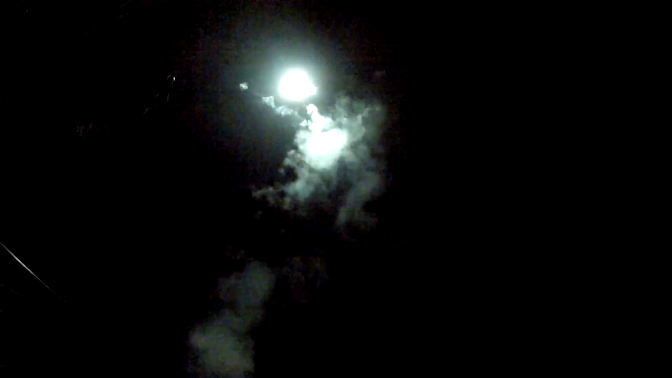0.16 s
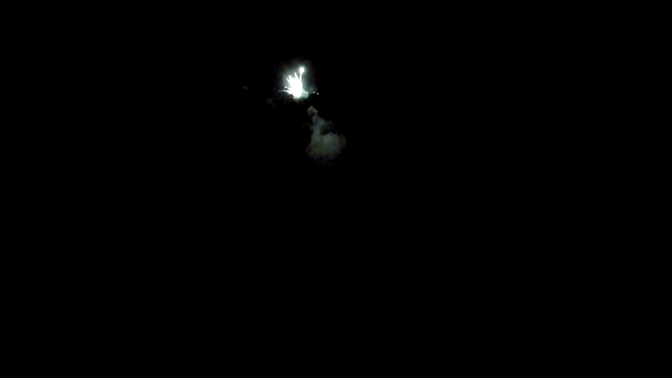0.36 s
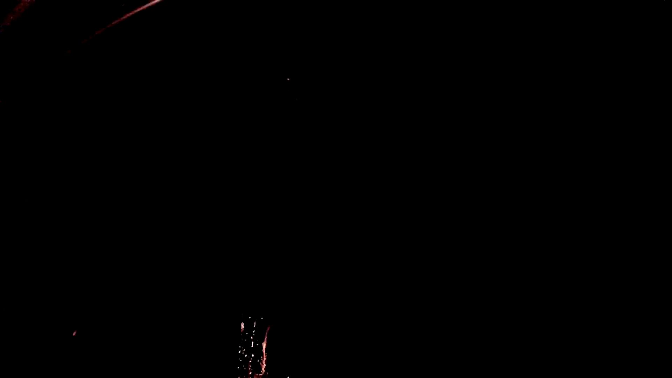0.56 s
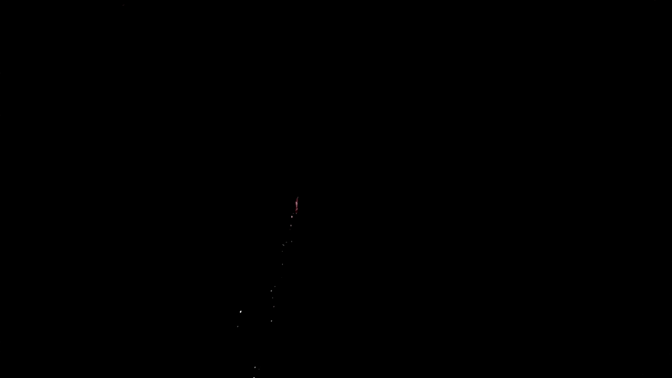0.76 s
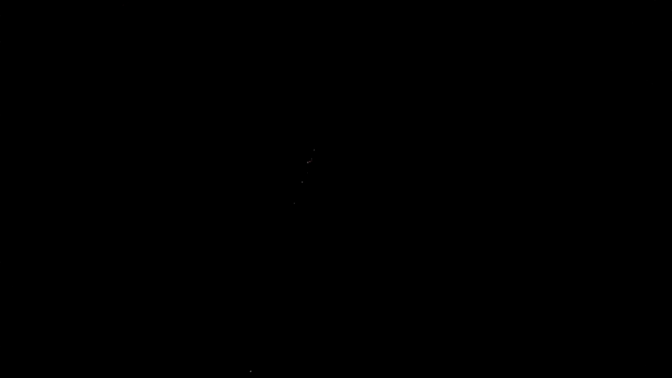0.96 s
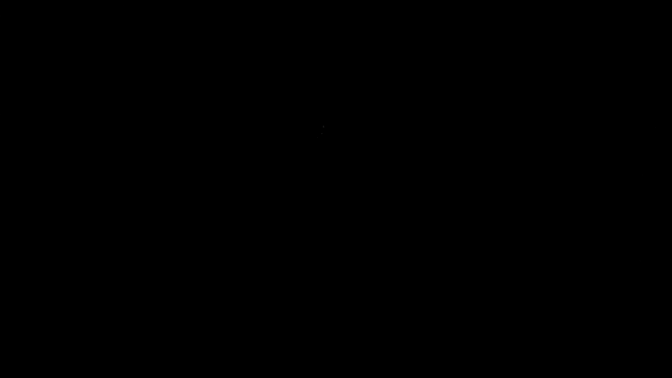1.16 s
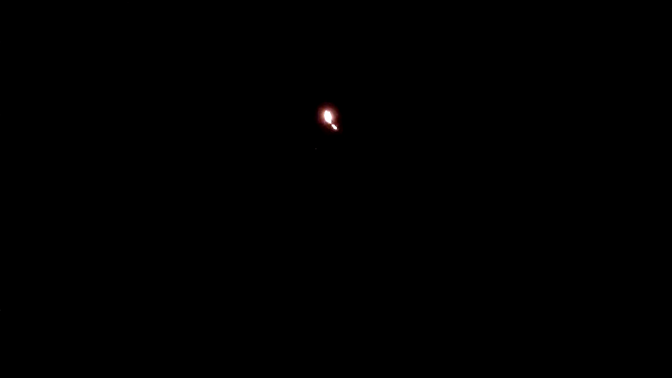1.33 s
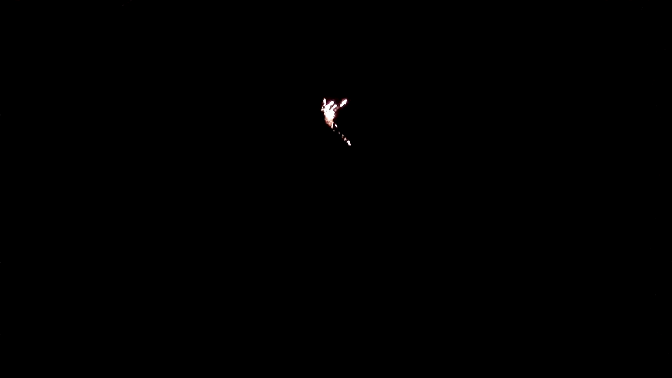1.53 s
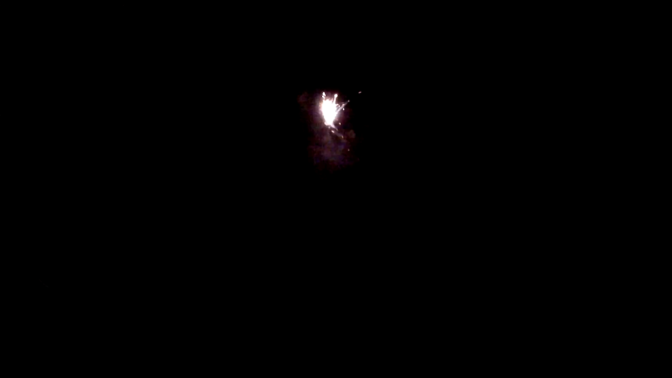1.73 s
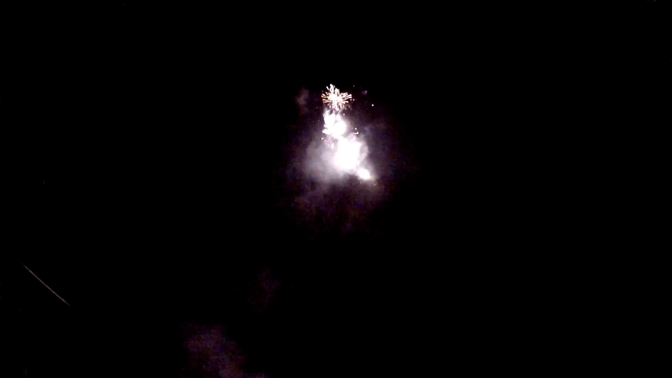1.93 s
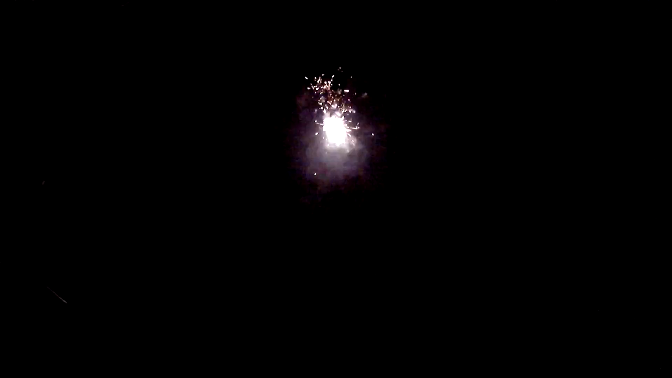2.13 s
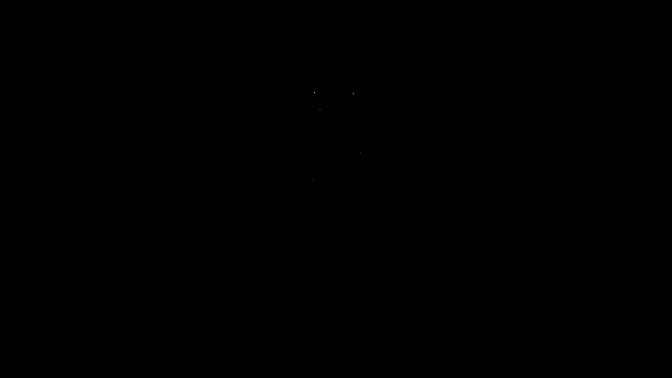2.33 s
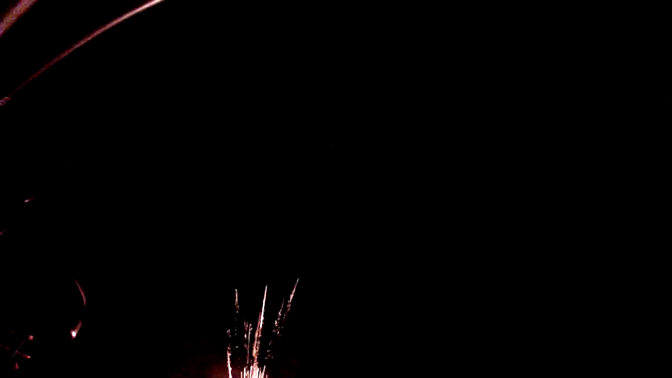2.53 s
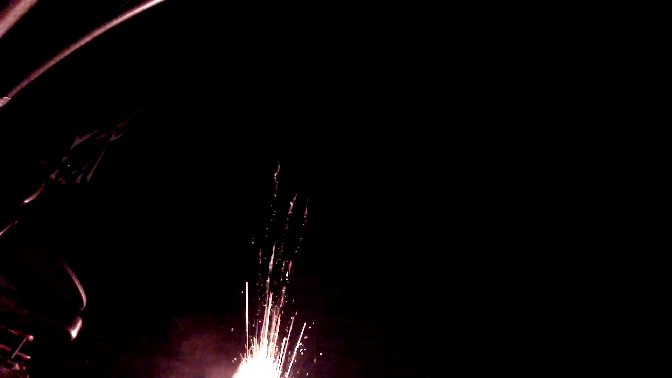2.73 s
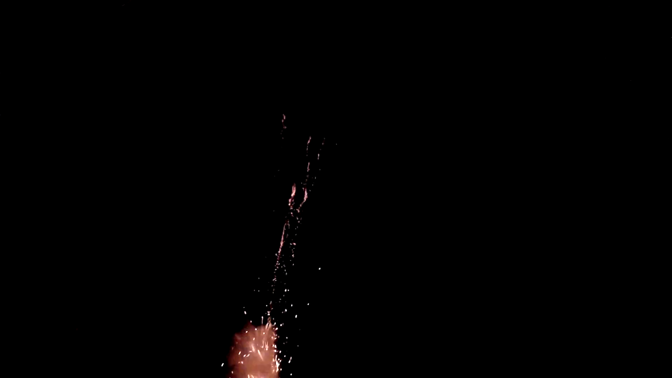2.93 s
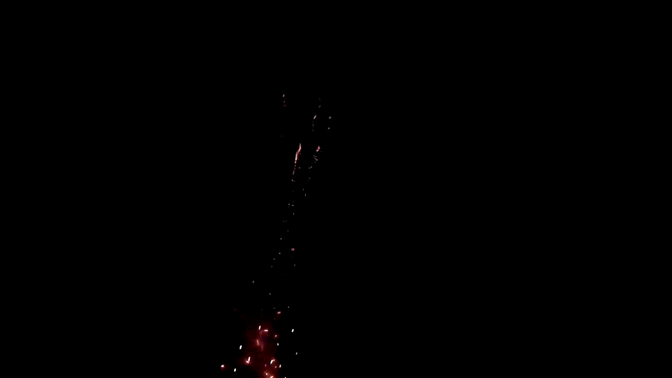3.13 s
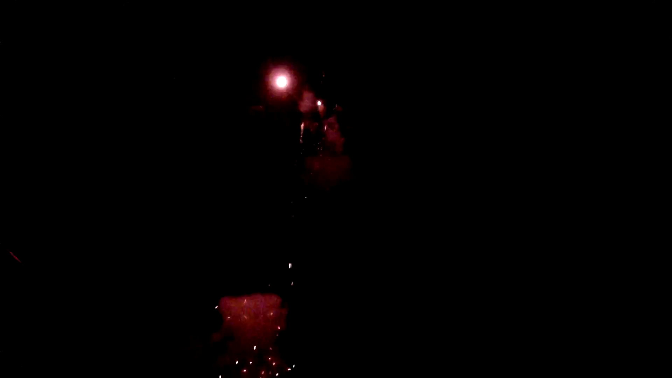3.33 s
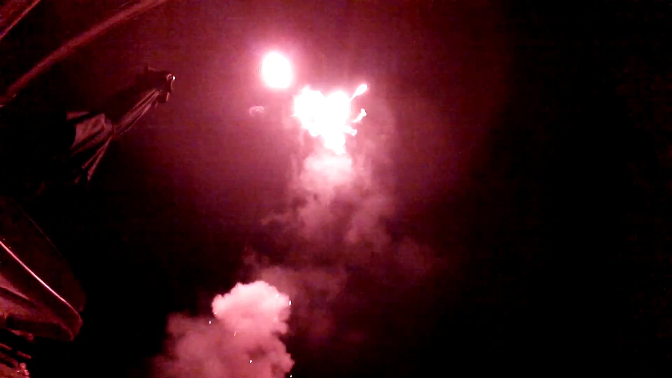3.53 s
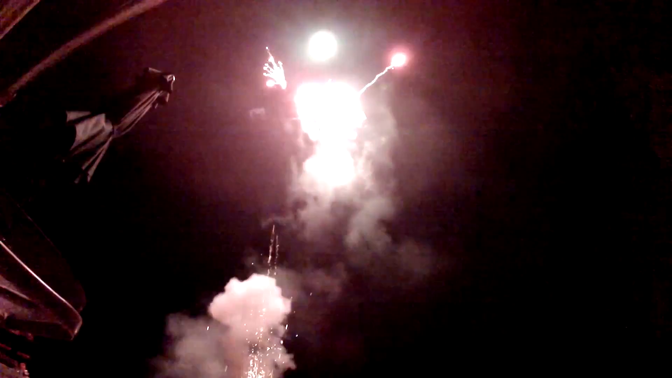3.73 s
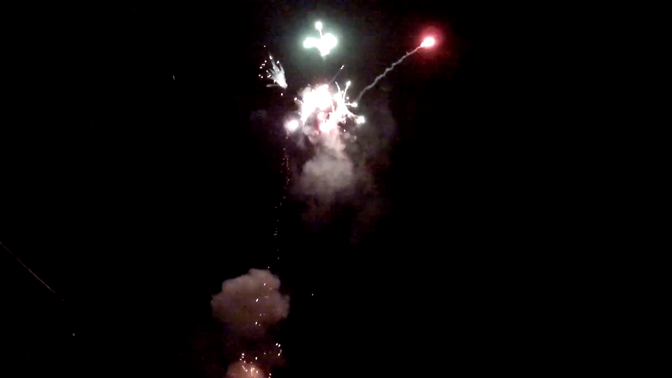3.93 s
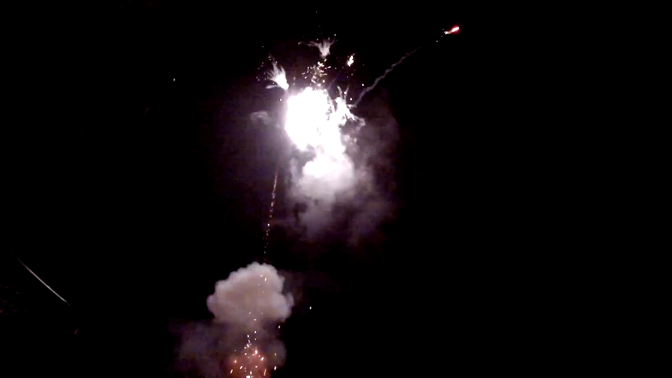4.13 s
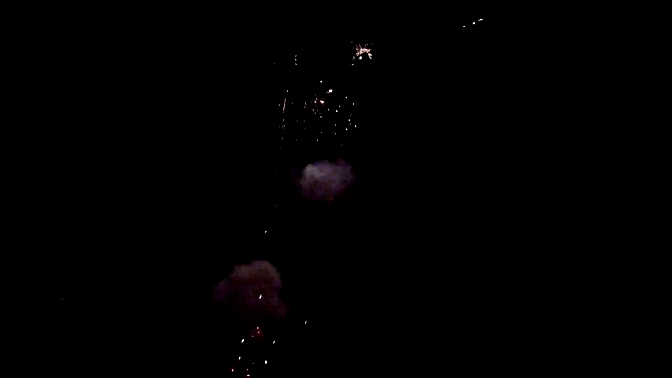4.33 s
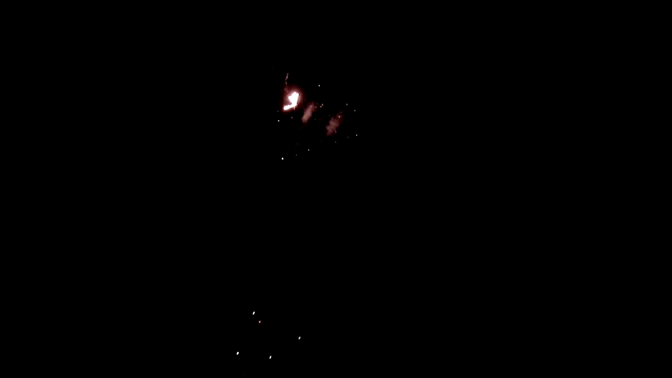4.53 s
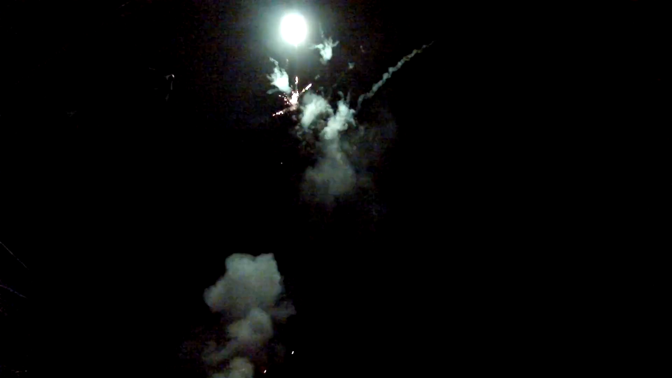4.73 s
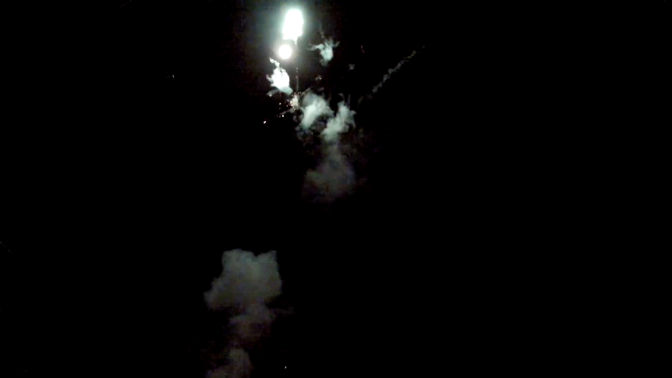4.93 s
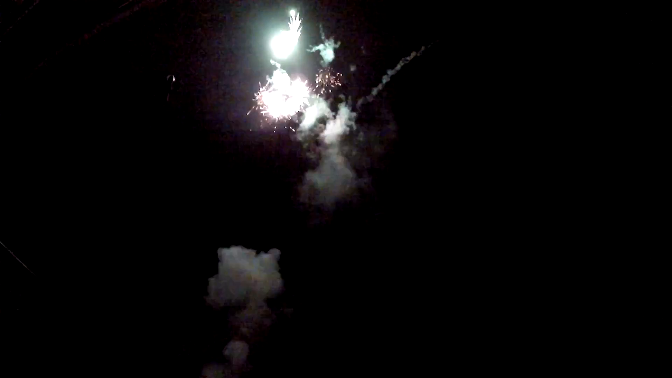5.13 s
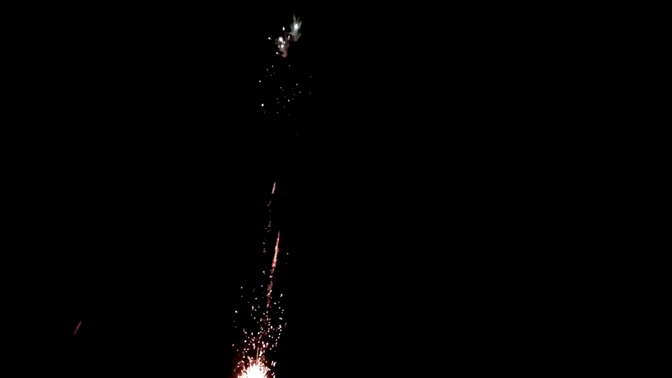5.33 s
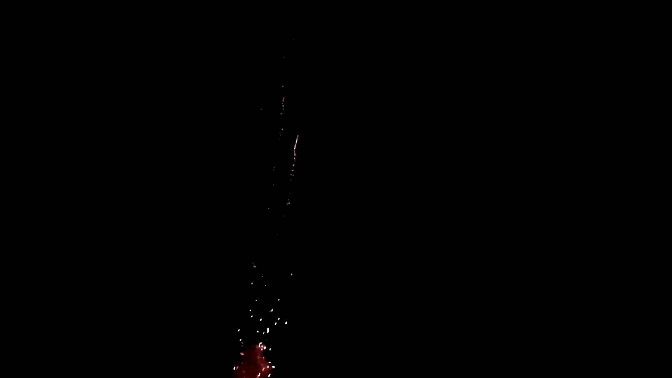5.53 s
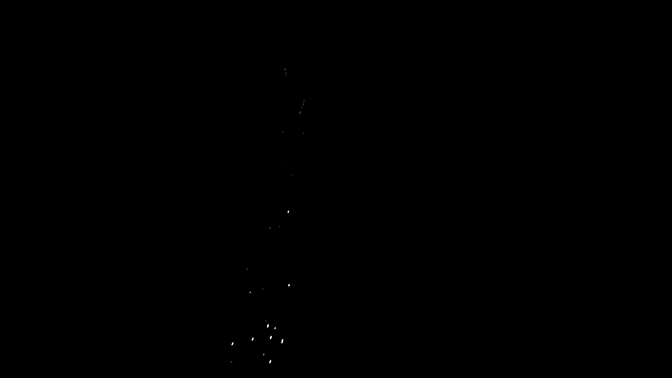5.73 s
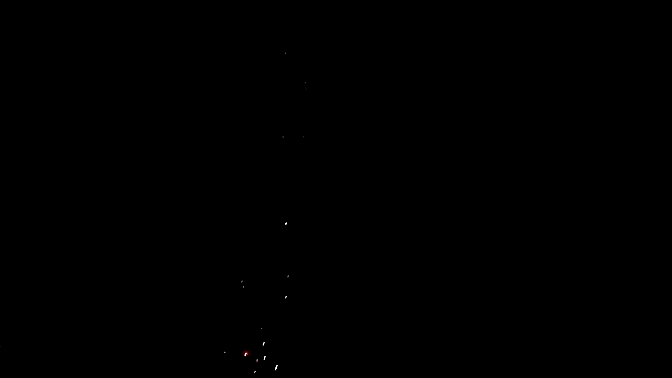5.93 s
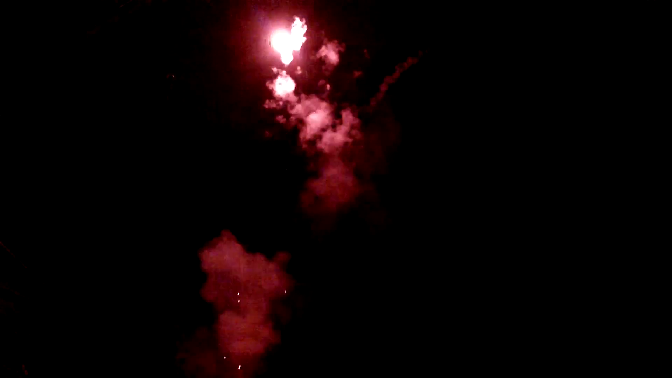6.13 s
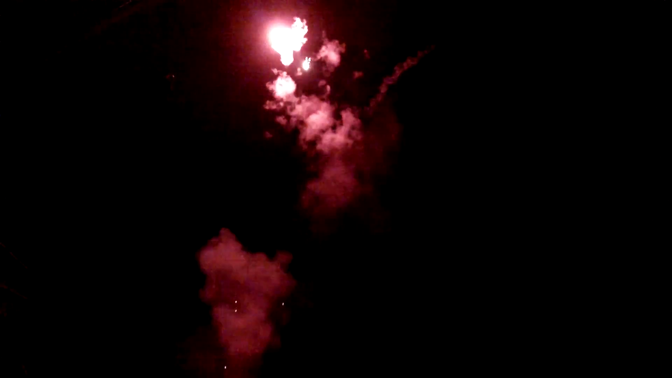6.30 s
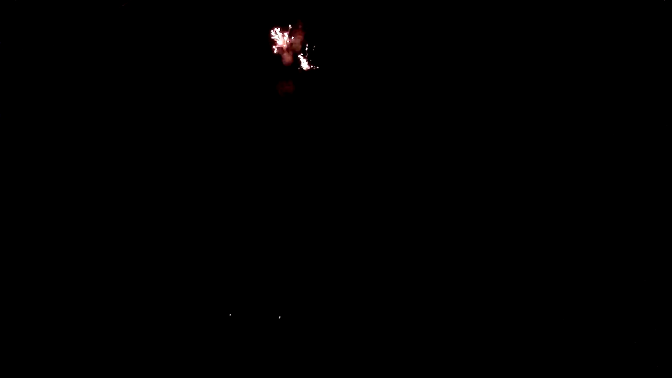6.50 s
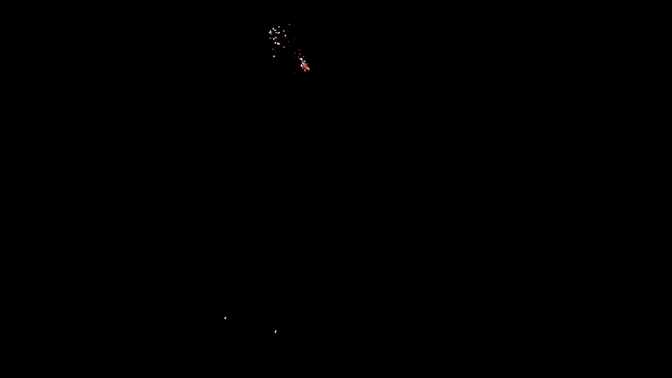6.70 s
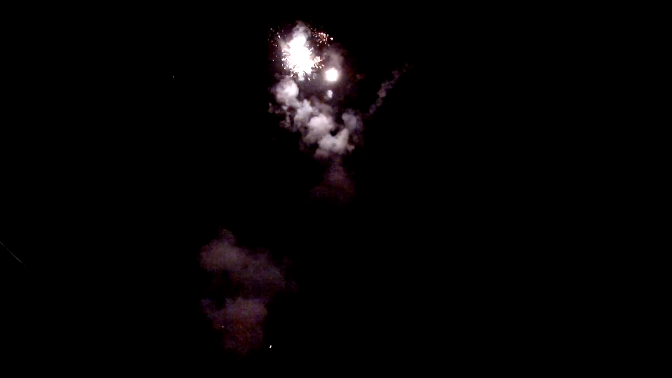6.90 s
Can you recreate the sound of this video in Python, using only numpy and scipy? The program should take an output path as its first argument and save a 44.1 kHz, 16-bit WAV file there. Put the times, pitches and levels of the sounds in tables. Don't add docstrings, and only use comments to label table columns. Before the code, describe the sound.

An open field at night, quiet low town rumble and faint microphone hiss, with small debris knocks and metallic clinks. At 0.57 s two nearly merged, thin, sharp lift shots crack from nearby tubes, their echoes rolling away. Soft far pops follow around 1.35 and 1.55 s. From 1.83 to 2.23 s loud dry star cracks snap overhead, growing denser. At 2.56 to 2.84 s a ragged volley of heavy launches bangs and overloads, leaving dull echo. Thin burning hiss swells near 3.6 s amid far pops, with launches at 3.65, 3.7 and 4.04 s. Softer crackles from 3.97 s become a tight rattle at 4.2-4.3 s, stragglers to 4.47. Another crackle runs 5.1-5.4 s, pierced by a big thump at 5.26 and a second at 5.29, with a last loud crack at 5.51. Quieter echoes and distant pops follow until a small crackle and far volley at 6.84-6.96 s with a weak final launch.

```python
import sys
import numpy as np
from scipy import signal
from scipy.io import wavfile

SR = 44100
rng = np.random.default_rng(int(sys.argv[2]) if len(sys.argv) > 2 else 0)


def int16_out(signal):
    q = np.round(np.clip(np.atleast_2d(signal).T, -1, 1) * 32767)
    wavfile.write(sys.argv[1], SR, q.astype(np.int16))


def convert_level_to_amplitude(level_db):
    exponent = np.asarray(level_db, float) / 20
    return 10 ** exponent


N = 306936

# (frequency [Hz], level [dB per Hz])
TOWN_SPECTRUM = [(13, -40), (22, -3.5), (87, 3.5), (162, -2), (407, -11.5), (844, -18), (1700, -26.5),
                 (1900, -23.5), (2620, -33.5), (4150, -38.5), (11300, -52.5), (14000, -77)]
# (time [s], level [dB])
TOWN_LEVELS = [(0, -52.5), (0.299, -51), (0.499, -58.5), (.85, -56), (1.2, -60), (1.5, -54.5), (3.2, -53.5),
               (5.9, -54), (6.2, -56), (6.45, -55), (6.7, -58), (6.96, -63)]
# (loudest time [s], level [dB])
TAILS = [
    (0, -87),
    (.62, -82.5),
    (1.5, -77),
    (2.95, -75.5),
    (3.62, -68),
    (5.85, -90.5),
    (6.45, -82.5),
]
# (time [s], peak level [dB], ring [Hz], time to fall 60 dB [s])
KNOCKS = [(0.071, -57, 423, 0.059), (0.194, -50, 680, 0.03), (0.306, -53.5, 460, 0.072),
          (0.694, -46, 352, 0.029), (0.775, -45, 328, 0.033), (1.332, -38.5, 337, 0.015),
          (1.49, -48, 804, 0.032), (1.56, -49, 810, 0.03), (1.655, -56, 315, 0.027),
          (2.522, -42, 320, 0.021), (3.083, -51, 405, 0.032), (5.058, -41.5, 398, 0.024),
          (6.028, -49.5, 287, 0.038), (6.422, -47, 327, 0.041), (6.445, -51.5, 494, 0.04)]
# (time [s], peak level [dB], ring [Hz], time to fall 60 dB [s])
BOOMS = [(0.697, -40.5, 92, 0.1), (1.268, -47.5, 92, 0.11), (1.56, -42.5, 130, 0.036),
         (1.751, -46.5, 107, 0.1), (3.019, -42.5, 97, 0.058), (3.904, -45, 145, 0.38),
         (4.661, -41, 47.6, 0.18), (5.427, -31.5, 108, 0.046), (.92, -50, 50, .2), (1.44, -52, 50, .15),
         (4.96, -50, 50, .15), (5.1, -48, 50, .12), (5.648, -40, 78.1, 0.066)]
# (time [s], peak level [dB], ring [Hz], time to fall 60 dB [s])
TICKS = [(2.899, -43, 2840, .012), (2.932, -47, 2750, .012), (3.124, -47.5, 1466, .015),
         (3.384, -57, 2760, 0.014), (3.584, -50, 4300, .006), (3.585, -50, 6800, .006),
         (3.585, -55, 8900, 0.0065), (3.626, -62, 7000, .006), (3.801, -40, 2900, .012),
         (3.801, -51, 6600, .008), (5.81, -55, 885, 0.027), (1.352, -65, 3740, .01),
         (6.45, -54, 900, 0.035), (6.329, -60, 4000, .008), (6.36, -74, 5500, .09),
         (6.322, -60, 1700, .015), (.86, -59, 181, .35), (.98, -55.5, 180, 0.29), (1.12, -53.5, 181, 0.17),
         (5.79, -57, 236, 0.24), (6.13, -54.5, 165.6, 0.16), (1.6, -56, 162, .2)]
# (time [s], peak level [dB], ring [Hz], time to fall 60 dB
# [s])
SLAPS = [(.5825, -29, 2800, .004), (.5735, -14, 2300, .004), (2.7345, -22, 900, .008),
         (2.8025, -12, 3100, .005), (2.812, -28, 3000, .015), (2.8365, -12, 1500, .004),
         (3.6435, -18, 4800, .004), (4.0392, -13, 5000, .0015), (4.0407, -12, 1100, .003),
         (4.0427, -3, 2300, .004), (3.646, -22, 330, .03), (4.043, -22, 330, .03), (5.258, -22, 320, .03),
         (2.563, -18, 280, .03)]
# (time [s], peak level [dB], second note [dB], rattle length [s])
CLINKS = [(.134, -47.5, -8, 0.054), (.16, -49.5, -10, 0.12), (.271, -41.5, -18, 0.02),
          (.533, -54, -9, .029), (.842, -49, -13, 0.024), (.885, -64, 5, 0.024), (1.057, -51, -6, 0.02),
          (1.315, -63, 1, 0.03), (1.373, -64, -13, .035), (1.404, -46, -12, 0.031), (1.439, -61, -15, .026),
          (1.574, -43.5, -17, 0.021), (1.591, -52, -11, .025), (3.235, -51.5, -9.5, 0.033),
          (3.384, -43.5, -14, 0.05), (3.524, -37.5, -7.5, 0.06), (6.169, -47.5, -21, 0.021),
          (6.298, -56.5, 3, 0.084), (6.623, -51, -4, 0.026)]
SHEET_NOTES = 840, 1690, 2700, 3740, 4700
# (time [s], peak level [dB], push length [ms], gas leak ahead [dB], low thump [dB])
LIFTS = [(.5700, -5, 0.23, -34.5, -29), (0.5742, -1, 0.21, -16, -38), (2.5606, -9.5, 0.45, -40.5, -26),
         (2.5628, -3, 0.2, -14, -27.5), (2.5640, 3.5, 0.24, -9.5, -15), (2.6220, -15.5, .047, -35, -28),
         (2.6240, 7, 0.25, -8.5, -25), (2.6454, 2.5, 0.52, -15, -21.5), (2.686, -9, .1, -32, -32.5),
         (2.6921, 0, 0.34, -23.5, -17), (2.7413, 2.5, 0.37, -18.5, -14.5), (2.8033, 4, 0.33, -8.5, -19),
         (2.8364, 2.5, 0.22, -19, -31), (3.6425, -13.5, 0.11, -28.5, -37), (3.6468, 3, 0.17, -19, -11),
         (3.7053, 5.5, 0.38, -11, -16), (4.0425, 7, 0.25, -12, -11), (5.2579, 8.5, 0.37, -11, -7.5),
         (5.2918, 2, 0.37, -18, -25.5), (6.9554, -15.5, 0.16, -31.5, -48)]
# (ring [dB], pitch ratio [1], gas leak [ms], ground bounce [dB], echo send [dB])
LIFT_TUBES = [(-1.5, .95, 6.1, -3.5, 3.5), (0.5, .95, 4.4, -9.5, 4.5), (0, 0.73, 3, -8.5, 1.5),
              (-1, 1.1, 1.8, -13.5, 0.5), (-0.5, 0.74, 1.2, -8.5, -0.5), (0, 1.1, 3.3, -11, 0.5),
              (-2.5, .95, 1.8, -10.5, -1.5), (-0.5, 0.7, 4.5, -8.5, 1), (-0.5, 1.01, 4, -13, 2.5),
              (0.5, 1.01, 5, -10, 2.5), (0.5, .95, 5, -6.5, -0.5), (2, 0.98, 3.5, -7, -0.5),
              (1.5, 1.01, 2.7, -7, -0.5), (0, 0.78, 2.2, -11, -1), (-0.5, 1.1, 3.8, -12.5, 1),
              (3.5, 1.02, 4.2, -6, -1.5), (2.5, 0.86, 4.5, -14, -1), (1, .95, 4.1, -11.5, 1),
              (1, 0.61, 5.4, -12, 1), (0.5, 1.1, 4.7, -17, 0.5)]
# (frequency [Hz], level [dB], time to fall 60 dB [s])
TUBE_NOTES = [
    (570, -13.5, 0.0055),
    (1230, -4, 0.004),
    (2200, -15.5, 0.0061),
    (2500, -15.5, 0.00063),
]
# (frequency [Hz], near level [dB], near time to fall 60 dB [s],
# yard level [dB], yard time to fall 60 dB [s], far level [dB], far time to fall 60 dB [s])
GROUND_ECHOES = [(91, -30, 0.005, -40.5, 0.18, -62, 1.1), (236, -38, 0.007, -42.5, 0.43, -67, 1.7),
                 (556, -31, 0.024, -37, 0.13, -64.5, 1.9), (1200, -30.5, 0.018, -46.5, 0.16, -67, 1.5),
                 (2850, -33.5, 0.013, -40.5, 0.14, -64.5, 1.4), (5470, -31, 0.0073, -41, 0.11, -67, 1.8),
                 (10000, -27.5, 0.011, -32.5, 0.065, -61.5, 0.54)]
# (delay [ms], level [dB])
GROUND_WALLS = [
    (11, -24),
    (25, -33),
    (96.5, -39.5),
    (99, -42.5),
    (101.5, -48.5),
    (204, -44.5),
]
# (time [s], peak level [dB])
STARS_1 = [(1.83249, -5.4), (1.84424, -1.9), (1.88714, -1.5), (1.91966, -2.3), (1.92254, -4.9),
           (1.93914, -4.8), (2.00633, -.3), (2.008, -2.5), (2.03091, -3.8), (2.04299, -3.2), (2.04558, -.9),
           (2.05322, 2.3), (2.05422, -2.5), (2.07907, -2.4), (2.11533, 1.2), (2.11776, 1.4), (2.12492, -1),
           (2.16206, .2), (2.18429, -2.9), (2.18728, 2.5), (2.21159, 1.6), (2.2319, 2)]
STARS_2 = [(3.97317, -7.9), (4.01086, -6.7), (4.03338, -4.5), (4.03497, -6.3), (4.06356, -7.8),
           (4.06948, -8.6), (4.07705, -9.4), (4.08297, -14.2), (4.09392, -7), (4.12143, -8.9),
           (4.12635, -12.2), (4.14091, -9.1), (4.14753, -3.4), (4.16111, -5), (4.16222, -1.3),
           (4.17392, -4.7), (4.18227, -5.9)]
STARS_3 = [(4.20315, -1.4), (4.20549, -3.7), (4.20834, -1.6), (4.2107, -7.5), (4.21227, -4.7),
           (4.21469, -4.2), (4.21626, -5.1), (4.22093, -3), (4.23374, -3.5), (4.24059, -5.5),
           (4.24161, -3.7), (4.24644, -5.7), (4.24791, -6.5), (4.2505, -3), (4.25639, -6.8), (4.2607, -1.4),
           (4.2617, -2.3), (4.26279, -1.9), (4.26363, 1.1), (4.27544, -2.6), (4.30617, -5.8),
           (4.31651, -2.4), (4.41825, -5), (4.46769, -2.9)]
STARS_4 = [(4.89154, -5.8), (5.10472, -2.6), (5.10909, -3), (5.11794, -1.1), (5.13984, -5.2),
           (5.16932, -2.6), (5.17011, -3), (5.1993, -.8), (5.21435, -2.3), (5.21986, -1.6), (5.2234, -1.7),
           (5.22456, -.7), (5.23363, -3.4), (5.24029, -2), (5.2717, -8.5), (5.28014, -7.7), (5.29753, -4.5),
           (5.31927, -4.4), (5.37812, 1.3), (5.51224, 1.4)]
STARS_5 = [(6.89274, -6.9), (6.91472, -6.7), (6.91959, -11.9), (6.92803, -4.2), (6.94311, -7.5),
           (6.9554, -9.5)]
# (stars (time [s], peak level [dB]), bounce lag [ms])
SHELLS = [
    (STARS_1, 1.56),
    (STARS_2, 1.59),
    (STARS_3, 1.56),
    (STARS_4, 1.58),
    (STARS_5, 1.64),
]
# (time [s], peak level [dB], snap [dB])
FAR_POPS = [(.266, -40, -37), (.664, -42, -22), (.858, -54, -33), (.895, -55, -22), (0.962, -56, -32),
            (1.056, -52, -35), (1.352, -33, -38.5), (1.553, -43, -36.5), (1.718, -54, -35.5),
            (3.402, -30.5, -38), (3.498, -34, -36), (3.555, -26.5, -28.5), (3.597, -28, -24),
            (4.975, -26, -21.5), (5.693, -38, -30), (6.15, -40.5, -17), (6.297, -48.5, -28),
            (6.349, -34.5, -10.5), (6.508, -33, -14.5), (6.833, -42, -38)]
# (frequency [Hz], near level [dB], near time to fall 60 dB [s],
# yard level [dB], yard time to fall 60 dB [s], far level [dB], far time to fall 60 dB [s])
SKY_ECHOES = [(92, -29.5, 0.064, -37.5, 0.16, -53, 0.69), (244, -21.5, 0.025, -27, 0.035, -48, 1.2),
              (650, -26, 0.022, -48.5, 0.13, -63, 3.9), (1300, -40.5, 0.023, -40.5, 0.16, -54.5, 1.6),
              (2900, -27, 0.018, -38, 0.09, -58, 1.87), (5460, -43, 0.02, -37, 0.063, -59.5, 1.3),
              (8500, -39, 0.049, -46, 0.14, -60, 0.67)]
# (delay [ms], level [dB])
SKY_WALLS = [
    (47, -36),
    (82, -33.5),
    (100, -27),
    (181, -28.5),
    (195, -30.5),
]


def low_pass(x, hz):
    return signal.sosfilt(signal.butter(2, np.clip(hz, 50, 19000), fs=SR, output="sos"), x)


def high_pass(x, hz, order=2):
    return signal.sosfilt(signal.butter(order, hz, "high", fs=SR, output="sos"), x)


def band_pass(x, low_hz, high_hz, order=2):
    return signal.sosfilt(signal.butter(order, [low_hz, high_hz], "band", fs=SR, output="sos"), x)


def ring(clicks, hz, t60):
    r, w = convert_level_to_amplitude(-60 / (t60 * SR)), 2 * np.pi * hz / SR
    return signal.lfilter([0, np.sin(w)], [1, -2 * r * np.cos(w), r * r], clicks + 1e-18)


def add(track, s, sound):
    i = max(round(s * SR), 0)
    track[i:i + len(sound)] += sound[:max(N - i, 0)]


def drift(rate, size):
    knots = rng.standard_normal(int(size * rate / SR) + 2)
    return np.interp(np.arange(size) * rate / SR, np.arange(len(knots)), knots)


def blast(push_ms, front_hz, fade=0.92):
    t = np.arange(400) / SR * 1000 / push_ms
    wave = low_pass((1 - t) * np.exp(-fade * t), front_hz)
    return wave / wave.max()


def bounced(wave, lag_ms, bounce_db, ground_hz):
    wait = np.zeros(round(lag_ms * SR / 1000))
    return np.r_[wave, wait] + convert_level_to_amplitude(bounce_db) * np.r_[wait, low_pass(wave, ground_hz)]


def echo_field(bands, edge_s, arrives_s):
    size = int(1.6 * SR)
    t = np.arange(size) / SR
    centres = np.array(bands)[:, 0]
    edges = np.r_[30, np.sqrt(centres[1:] * centres[:-1]), 17000]
    lumps = convert_level_to_amplitude(3.2 * drift(60, size) + 3.5 * drift(400, size))
    far_rise = 1 - np.exp(-(t / arrives_s) ** 2)
    close, distant = np.zeros((2, size))
    for (hz, near_db, near, yard_db, yard, far_db, far), low, high in zip(bands, edges, edges[1:]):
        band = band_pass(rng.standard_normal((2, size)), low, high)
        close += band[0] * convert_level_to_amplitude(near_db - 60 * t / near)
        yard_fall = 1 + (hz > 900) * (t / edge_s) ** 6
        yard_level = convert_level_to_amplitude(yard_db - 60 * t / yard) / yard_fall
        far_level = lumps * convert_level_to_amplitude(far_db - 60 * t / far) * far_rise
        distant += band[1] * (yard_level + far_level)
    wait = np.zeros(round(2.0 * SR / 1000))
    return np.r_[wait, close[:4000]], np.r_[wait, distant]


def echoed(direct, unbounced, bands, walls, wall_hz, edge_s, arrives_s):
    out = direct.sum(0)
    for heard, sent in zip(direct, unbounced):
        close, distant = echo_field(bands, edge_s, arrives_s)
        slaps = np.zeros(len(distant))
        for ms, db in walls:
            add(slaps, ms / 1000, convert_level_to_amplitude(db) * rng.normal(1, 0.18, 1))
        distant = distant + low_pass(slaps, wall_hz)
        out = out + signal.oaconvolve(heard, close)[:N]
        out = out + signal.fftconvolve(sent, distant)[:N]
    return out


def town():
    out, edges, points = 0, 20 * 2 ** np.arange(0, 10, .5), np.array(TOWN_SPECTRUM)
    white, together = rng.standard_normal((2, N)), drift(5.1, N)
    for k, (low, high) in enumerate(zip(edges, edges[1:])):
        band = band_pass(white[k % 2], low, high)
        level_db = np.interp(np.log(low * high) / 2, np.log(points[:, 0]), points[:, 1])
        out = out + band * convert_level_to_amplitude(level_db + 2.5 * (together + drift(11.0, N)))
    s, db = np.transpose(TOWN_LEVELS)
    return out / out.std() * convert_level_to_amplitude(np.interp(np.arange(N) / SR, s, db))


def fizz():
    t = np.arange(N) / SR
    swell_db_per_s, fade_db_per_s = 36.5, 46
    level = 0
    for s, db in TAILS:
        level = level + convert_level_to_amplitude(db - np.maximum(swell_db_per_s * (s - t), fade_db_per_s * (t - s)))
    hiss = band_pass(rng.standard_normal(N), 4300, 11000, order=4)
    steady = band_pass(rng.standard_normal(N), 3000, 12300, order=4)
    grains = convert_level_to_amplitude(2.8 * drift(110, N))
    return 1.1 * level * hiss * grains + convert_level_to_amplitude(-88) * steady


def debris():
    out = np.zeros(N)
    for s, db, hz, t60 in KNOCKS + BOOMS + TICKS + SLAPS:
        contact = np.hanning(2 + round(.4 * SR / hz))
        add(out, s, convert_level_to_amplitude(db) * ring(np.r_[2.5 * contact / contact.sum(), np.zeros(12000)], hz, t60))
    for s, db, second_db, rattle_s in CLINKS:
        t = np.arange(5000) / SR / rattle_s
        rattle = rng.standard_normal(5000) * np.sqrt(t) * np.exp(-3.5 * t) / 3
        upper_db = second_db - 24
        levels_db = db + np.array([0, second_db, upper_db - 4, upper_db + 5, upper_db - 8])
        sheet = sum(convert_level_to_amplitude(g_db) * ring(rattle, hz, t60=.03) for hz, g_db in zip(SHEET_NOTES, levels_db))
        scrape = convert_level_to_amplitude(db + 7.5) * band_pass(rattle, 400, 2800)
        add(out, s, 0.98 * sheet + scrape)
    return out


def gas_leak(leak_ms, leak_db, thump_db, pitch):
    count = round(np.clip(leak_ms, 1, 10) * SR / 1000)
    swell = np.r_[np.geomspace(convert_level_to_amplitude(-30), 1, count) ** .7, np.exp(-np.arange(200) / 60)]
    noise = rng.standard_normal(900)[:len(swell)]
    hiss = band_pass(noise, 900, 3300)
    hiss += 1.7 * ring(noise, hz=920 * pitch, t60=0.0023) / 6
    hiss = high_pass(hiss, 350)
    pressure = convert_level_to_amplitude(thump_db - 8) * np.linspace(0, 1, count + 200) ** 2
    return count / SR, swell * (6.04 * convert_level_to_amplitude(leak_db) * hiss + pressure)


def uncorked_tube(push_ms, ring_db, pitch, bass_cut_hz):
    wave = low_pass(blast(push_ms, front_hz=6200, fade=0.61), 2100 / push_ms)
    kick = np.r_[np.diff(wave), np.zeros(1500)]
    tube = np.zeros(len(kick))
    for (hz, note_db, t60), spread_db in zip(TUBE_NOTES, rng.normal(0, 1.5, len(TUBE_NOTES))):
        tube += convert_level_to_amplitude(note_db + ring_db + spread_db) * ring(kick, pitch * hz, t60)
    tube[:len(wave)] += wave
    return high_pass(tube, bass_cut_hz)


def lifts():
    direct, sent = np.zeros((2, 2, N))
    thump = low_pass(ring(np.r_[1, np.zeros(3000)], hz=88, t60=.016), 900)
    for k, (lift, lift_tube) in enumerate(zip(LIFTS, LIFT_TUBES)):
        s, db, push_ms, leak_db, thump_db = lift
        ring_db, pitch, leak_ms, bounce_db, send_db = lift_tube
        side = k % 2
        bass_cut_hz = 290 if k < 2 else 20
        tube = uncorked_tube(push_ms, ring_db, pitch, bass_cut_hz)
        add(sent[side], s, convert_level_to_amplitude(db + send_db) * tube)
        add(direct[side], s - .00015, convert_level_to_amplitude(db) * bounced(tube, 1.78, bounce_db, ground_hz=3100))
        add(direct[side], s - .001, convert_level_to_amplitude(thump_db) * thump)
        lead_s, leak = gas_leak(leak_ms, leak_db, thump_db, pitch)
        add(direct[side], s - lead_s, leak)
    return echoed(direct, sent, GROUND_ECHOES, GROUND_WALLS, wall_hz=5000, edge_s=.048, arrives_s=.075)


def far_pops(direct, sent):
    volley = [(6.8445 + .008 * e, -30.5 - 4 * e - 3 * g, -36) for e, g in rng.exponential(1, (14, 2))]
    pop = low_pass(blast(0.074, front_hz=2860), 5500)
    snap = low_pass(blast(0.19, front_hz=11000), 11500)
    for s, db, snap_db in FAR_POPS + volley:
        wave = convert_level_to_amplitude(db) * (pop + convert_level_to_amplitude(snap_db + 18.5) * snap)
        add(sent, s + 0.0012, wave)
        add(direct, s + .002, bounced(wave, lag_ms=1.62, bounce_db=-3.5, ground_hz=6000))


def star_cracks(direct, sent):
    cracks = [(s, db, lag_ms) for table, lag_ms in SHELLS for s, db in table]
    chances = rng.standard_normal((len(cracks), 5))
    for (s, db, lag_ms), (side, higher, longer, harder, sharper) in zip(cracks, chances):
        k = int(side > 0)
        push_ms = 0.078 * np.exp(0.13 * longer) - 0.05 * max(db - 3, 0)
        wave = convert_level_to_amplitude(db + 0.8) * blast(1.63 * push_ms, front_hz=9400 * np.exp(.08 * sharper))
        add(sent[k], s, wave)
        bounce_db = -3 + 1.2 * harder
        add(direct[k], s - 3 / SR, bounced(wave, lag_ms + .04 * higher, bounce_db, ground_hz=15200))


def stars():
    direct, sent = np.zeros((2, 2, N))
    star_cracks(direct, sent)
    far_pops(direct[0], sent[0])
    push = signal.lfilter([.05], [1, -.95], -np.maximum(direct.sum(0), 0))
    heave = high_pass(ring(push, hz=200, t60=.014), 150)
    bursts = echoed(direct, sent, SKY_ECHOES, SKY_WALLS, wall_hz=3500, edge_s=.5, arrives_s=0.052)
    return bursts + convert_level_to_amplitude(-30.0) * heave


def scene():
    return (town() + fizz() + debris() + convert_level_to_amplitude(-4.0) * lifts() + stars())[None]


def top_cut(x):
    return signal.sosfilt(signal.butter(12, 16510, fs=SR, output="sos"), x)


def record(dry):
    x = -dry[0]
    lag = round(0.39 * SR / 1000)
    x = x - convert_level_to_amplitude(-15.5) * low_pass(np.r_[np.zeros(lag), x[:-lag]], 3000)
    x = high_pass(x, 59.5, order=1)
    x = np.clip(x, -1.02, 1.02)
    x = signal.sosfilt(signal.cheby2(8, 50, 16300, fs=SR, output="sos"), x)
    return top_cut(np.clip(x, -1, 1)[None])


dry = scene()
out = record(dry)
int16_out(out)
```